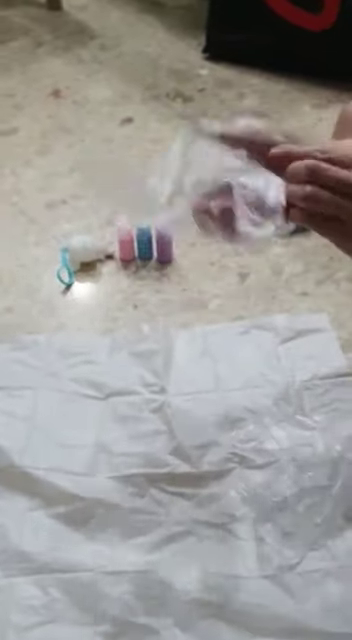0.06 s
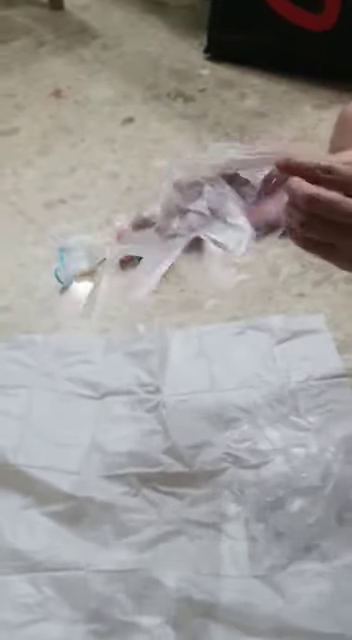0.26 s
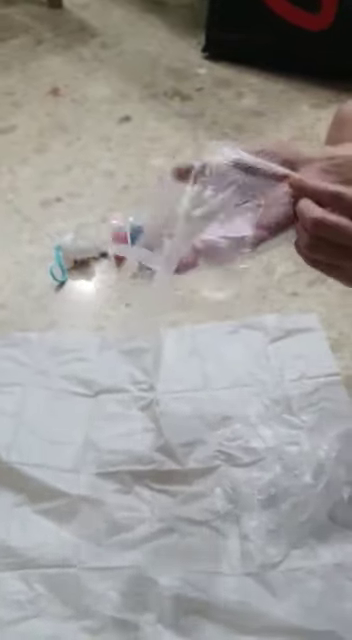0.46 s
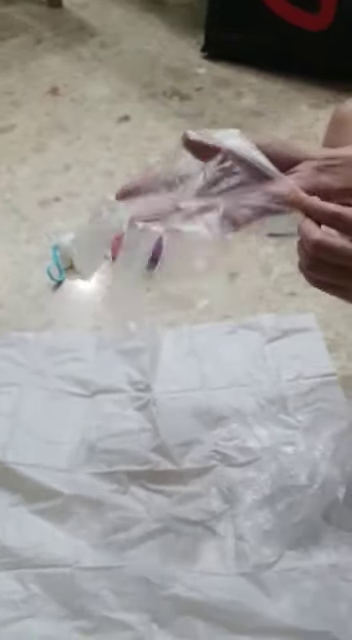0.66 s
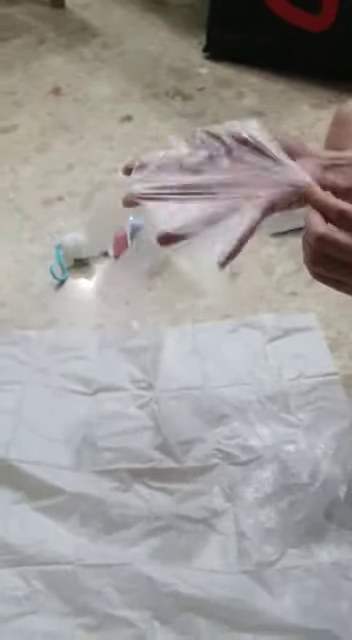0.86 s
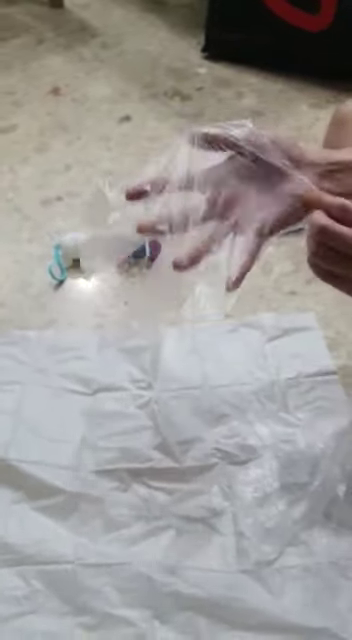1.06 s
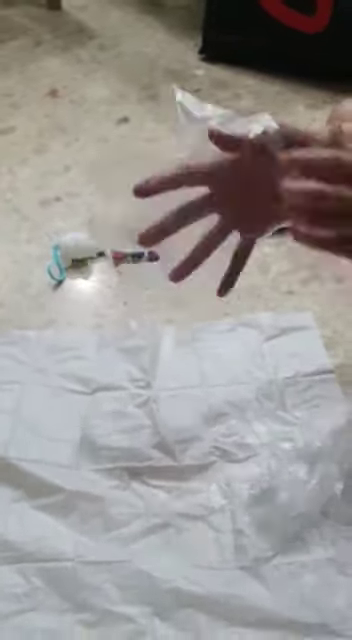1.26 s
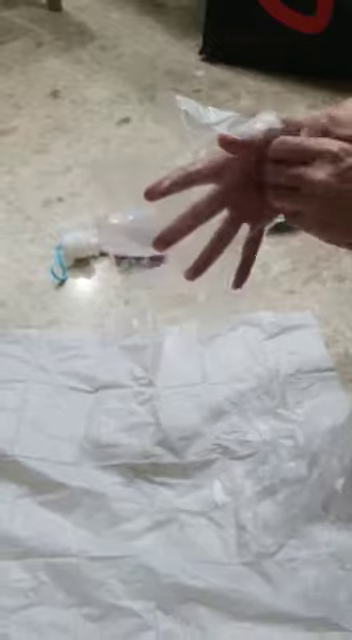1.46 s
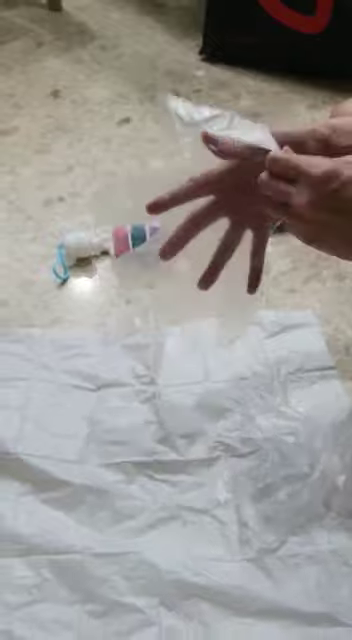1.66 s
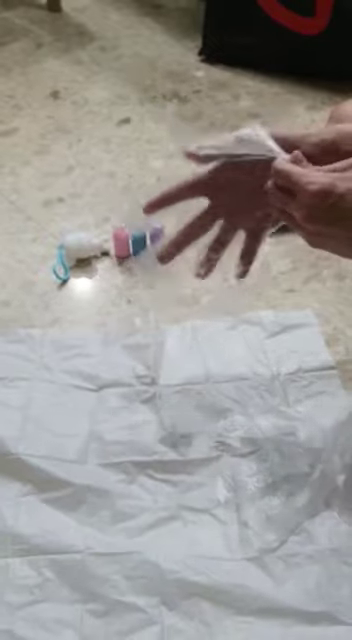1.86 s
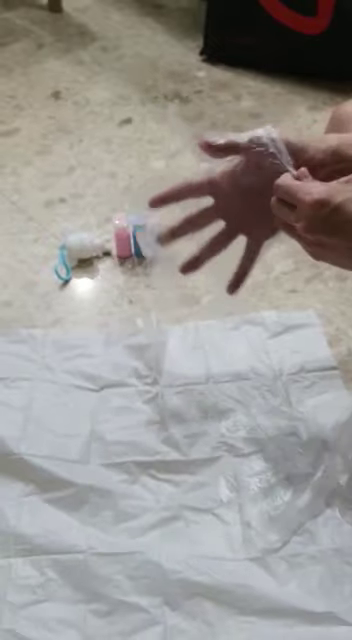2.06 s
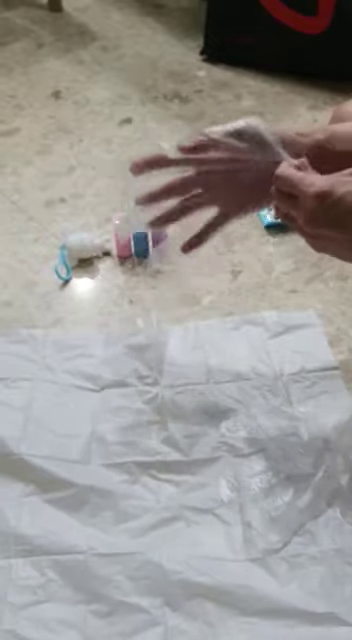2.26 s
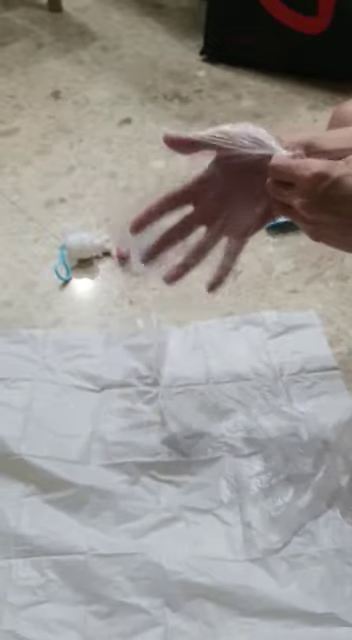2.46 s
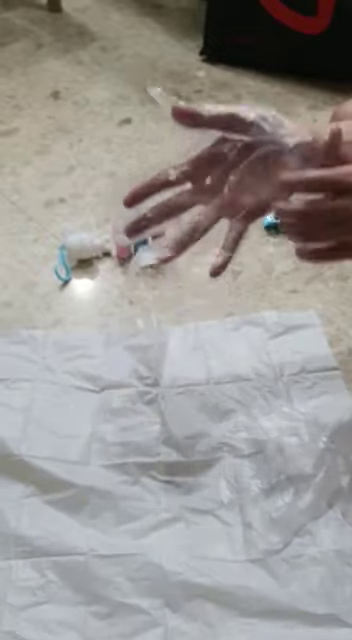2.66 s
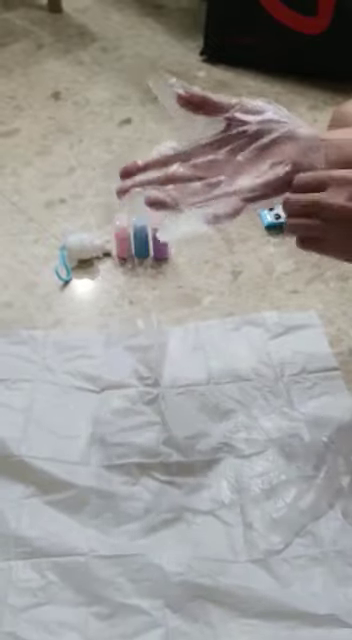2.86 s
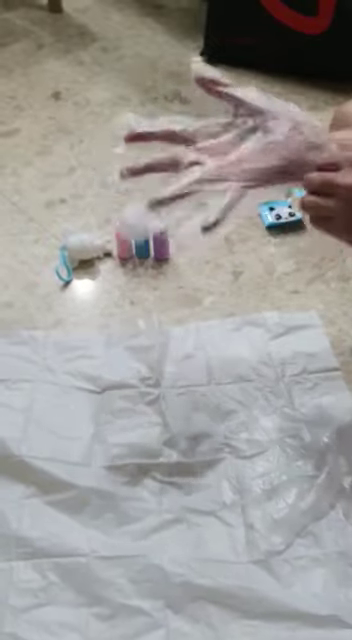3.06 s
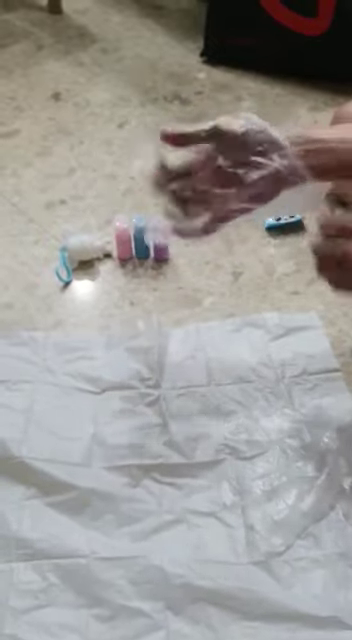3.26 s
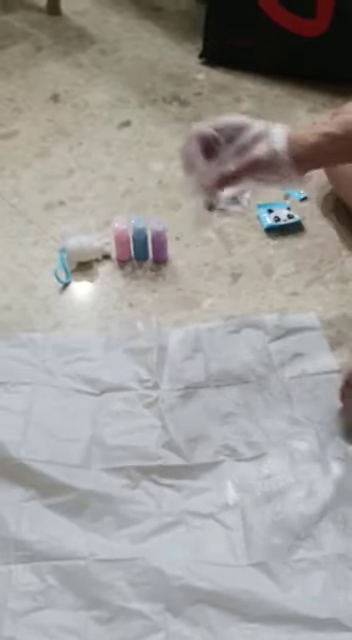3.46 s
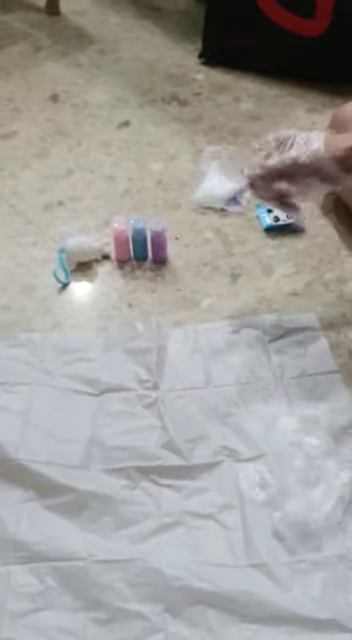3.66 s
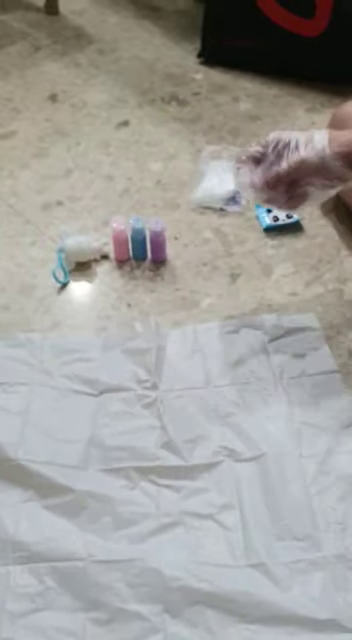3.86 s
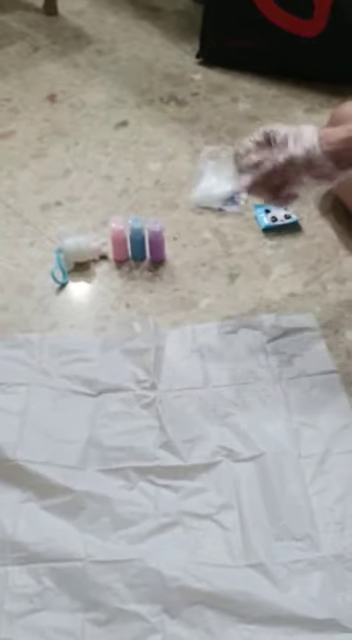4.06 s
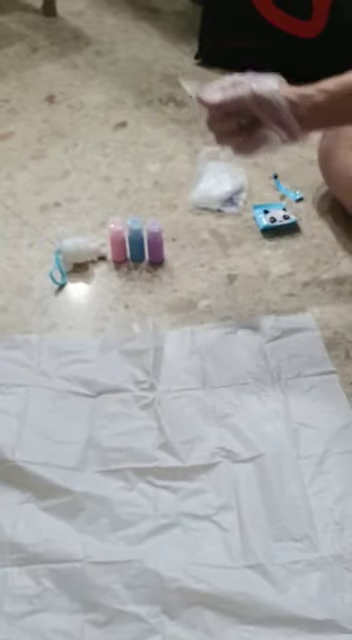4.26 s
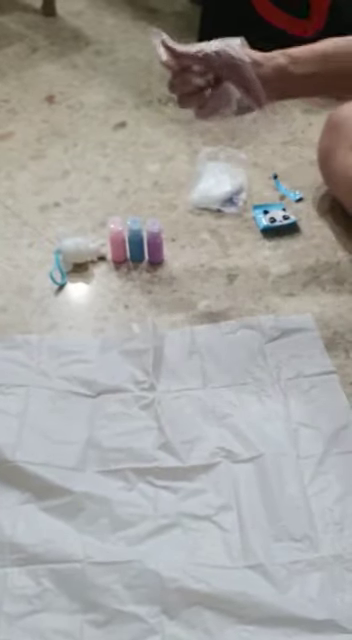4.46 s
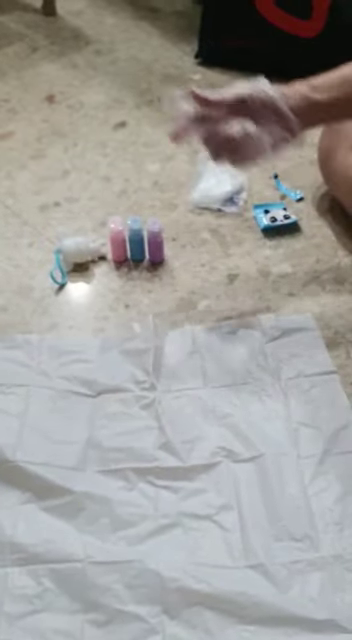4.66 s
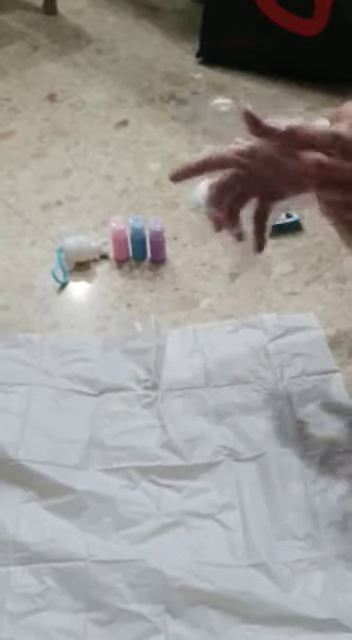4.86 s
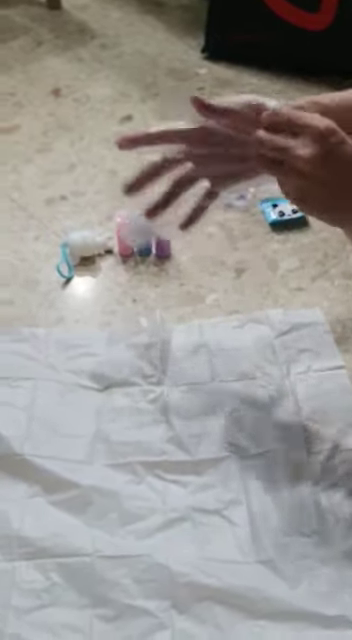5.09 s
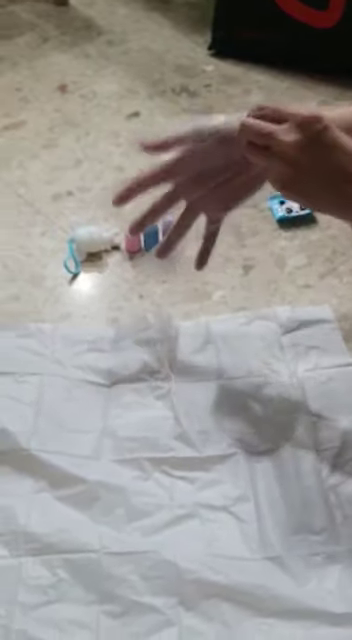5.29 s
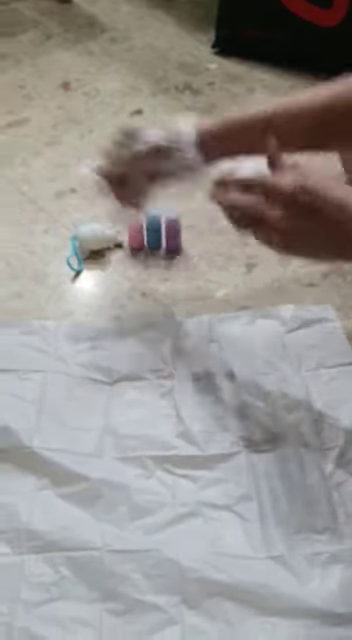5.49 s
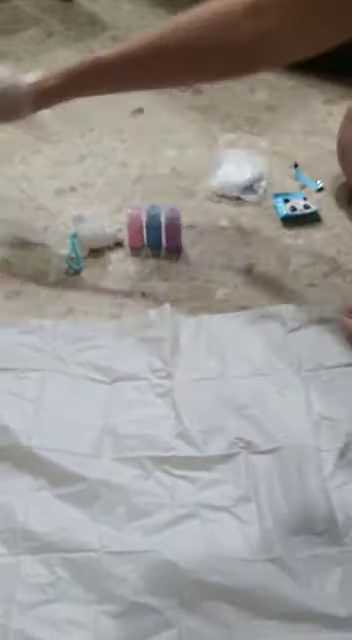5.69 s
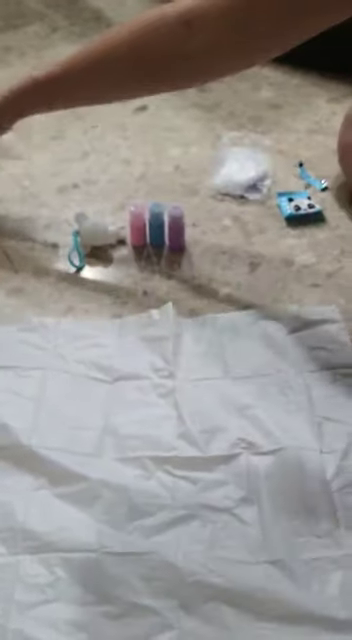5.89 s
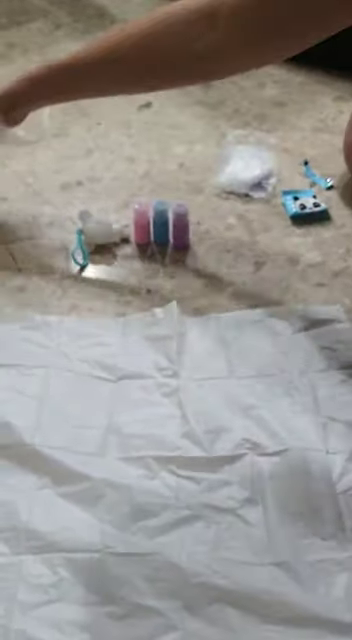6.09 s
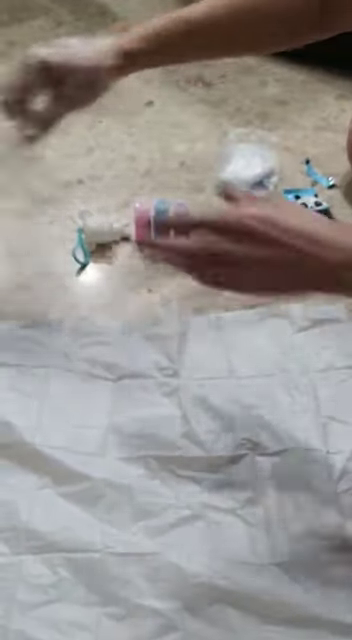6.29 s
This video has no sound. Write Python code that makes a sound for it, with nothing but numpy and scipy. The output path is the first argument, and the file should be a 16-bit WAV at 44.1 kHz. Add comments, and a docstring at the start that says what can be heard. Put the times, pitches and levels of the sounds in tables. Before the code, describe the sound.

A thin plastic glove is pulled on and flexed very near a stereo microphone in a small room with quiet air and a faint, steady low hum. From 0 to 1.2 s, quick uneven tugs give bright hissing and crackling crumples, with a cluster of small snaps around 0.7-0.85 s. From 1.2 to 1.6 s it thins to light rustle. Between 1.65 and 2.5 s the tugs are strong, with crisp cracks near 1.8 and the sharpest at about 2.15 s. More crumpling and snaps come at 2.9-3.1 s. From 3.2 to 5 s the film only rustles softly, with a brief crinkle near 4.5 s. At 5.1-5.2 s a loud, sudden burst of crackle breaks out, followed by smaller rustles to 5.5 s. A short dull knock sounds at 5.7 s, slightly right, then faint rustling fades into room hum by 6.3 s.

```python
"""Plastic glove pulled on

In a small room, close to a two-port microphone, a thin plastic glove is tugged onto a hand and flexed.
The film hisses as it slides on skin (dense tiny clicks), crumples under each tug (popping folds over a
fluttering sheet) and snaps taut (a crack and a dying burst of creases).
One dull knock of damped sines sounds near the end; room air and a faint low hum lie behind."""
import sys
import numpy as np
from scipy import signal
from scipy.fft import rfft, irfft, next_fast_len
from scipy.io import wavfile
from scipy.ndimage import map_coordinates

SR = 44100
rng = np.random.default_rng(int(sys.argv[2]) if len(sys.argv) > 2 else 0)


def generate_wav(sig):
    """Save sig (samples, or channels by samples) to the path in sys.argv[1] as 16-bit PCM at SR."""
    pcm = np.round(np.clip(np.atleast_2d(sig).T, -1, 1) * 32767).astype(np.int16)
    wavfile.write(sys.argv[1], SR, pcm)


N = 279153  # samples
TIME = np.arange(N) / SR  # seconds


def amp(db):
    """Decibels to gain."""
    return 10 ** (np.asarray(db) / 20)


def unit(x):
    """Scale to rms 1."""
    return x / np.sqrt(np.mean(x ** 2) + 1e-20)


def along_hz(points, hz):
    """Read (Hz, value) points on a log frequency axis."""
    point_hz, values = np.transpose(points)
    return np.interp(np.log(hz + 1), np.log(point_hz + 1), values)


def along_time(points):
    """Read (seconds, value) points at every sample."""
    return np.interp(TIME, *np.transpose(points))


def wobble(rate):
    """A smooth random curve with the given number of knots a second."""
    knots = rng.standard_normal(int(N * rate / SR) + 4)
    return map_coordinates(knots, [TIME * rate])


def filtered(x, response):
    """x times a complex response of frequency."""
    size = next_fast_len(N + SR // 4)
    spectrum = rfft(x, size) * response(np.fft.rfftfreq(size, 1 / SR))
    return irfft(spectrum, size)[..., :N]


def coloured(x, spectrum, size=2048):
    """x through a causal (minimum-phase) filter of energy 1 with the given spectrum."""
    gains = amp(along_hz(spectrum, np.fft.rfftfreq(size, 1 / SR)))
    cepstrum = irfft(np.log(gains))
    # folding the cepstrum forward in time makes the filter causal
    cepstrum[1:size // 2] *= 2
    cepstrum[size // 2 + 1:] = 0
    pulse = irfft(np.exp(rfft(cepstrum)))
    return signal.fftconvolve(x, pulse[None] / np.linalg.norm(pulse), axes=1)[:, :N]


def spread(pair, alike):
    """Mix two unrelated signals, taken as mid and side, into left and right of a given likeness."""
    def mid_side_gains(hz):
        turn = np.arccos(np.clip(along_hz(alike, hz), 0, 1)) / 2
        return np.array([np.cos(turn), np.sin(turn)])
    mid, side = filtered(pair, mid_side_gains)
    return np.array([mid + side, mid - side])


def thin(hz, corner_hz):
    """Second-order bass roll-off."""
    u = 1j * hz / corner_hz
    return u * u / (1 + np.sqrt(2) * u + u * u)


# Colour of the air in the room. Each row: frequency in Hz, relative level in dB per Hz.
AIR_COLOUR = [(12, -20), (20, -3), (48, -3), (70, -4), (125, -3.5), (170, -2), (230, -8.5), (350, -7),
              (580, -14), (1700, -11), (2500, -19), (5000, -15), (6500, -4), (9000, -17.5), (16000, -25.5)]
# Steady hum lines low in the room. Each row: frequency in Hz, level in dB rms before it wavers.
HUM_LINES = [(32.3, -62), (91.0, -69), (183.2, -62), (326, -76)]


def background():
    """Room air is coloured noise; the low hum, as of a fan, is sines wavering in level and phase."""
    noise = filtered(rng.standard_normal((2, N)), lambda hz: amp(along_hz(AIR_COLOUR, hz)))
    # likeness of left and right: (Hz, 0-1)
    air = amp(-52.5) * unit(spread(noise, [(100, 0.96), (500, 0.64), (2000, 0.28)]))
    waver_db, waver_rate = 1.3, 4  # depth in dB, knots a second
    hum = np.zeros(N)
    for hz, db in HUM_LINES:
        level = amp(db + waver_db * wobble(waver_rate))
        phase = 2 * np.pi * hz * TIME + 0.23 * wobble(2.91)
        hum += level * unit(np.sin(phase))
    return air + hum


def creases(per_second, scatter_db):
    """Tiny buckling clicks of uneven size, each radiating its own way; rms 1."""
    happens = rng.random(N) < per_second / SR
    size = amp(scatter_db * np.clip(rng.standard_normal(N), -2, 2))
    direction = rng.uniform(0, 2 * np.pi, N)
    return unit(happens * size * np.array([np.cos(direction), np.sin(direction)]))


def pop(turns, cycles):
    """A fold pops over and rings: a sine with a quick rise, fading by a factor e every few cycles."""
    return np.sin(2 * np.pi * turns) * np.exp(-turns / cycles) * (1 - np.exp(-2 * turns))


def grains(per_second, pitch, spread_octaves, cycles, scatter_db, size=256):
    """Many popping folds, scattered around a moving pitch, each radiating its own way; rms 1."""
    count = int(per_second * N / SR)
    luck = rng.random((count, 2))
    normal = np.clip(rng.standard_normal((count, 2)), -2, 2)
    start = (luck[:, 0] * N).astype(int)
    hz = pitch[start] * 2 ** (spread_octaves * normal[:, 0])
    # the root of the pitch makes up for the shorter ring of high folds
    strength = amp(scatter_db * normal[:, 1]) * np.sqrt(hz)
    rings = strength[:, None] * pop(hz[:, None] * np.arange(size) / SR, cycles)
    where = (start[:, None] + np.arange(size)).ravel()
    direction = 2 * np.pi * luck[:, 1:]
    mid = np.bincount(where, (rings * np.cos(direction)).ravel(), N)[:N]
    side = np.bincount(where, (rings * np.sin(direction)).ravel(), N)[:N]
    return unit(np.array([mid, side]))


# Tugs and flexes of the hand, close to the microphone.
# Each row: time of the peak in seconds, sliding level in dB, crumpling level in dB, release in seconds.
HAND_STROKES = [(0.013, -29.5, -35, 0.071), (.165, -32, -36, .09), (.36, -35.5, -42.5, 0.18),
                (.52, -43, -54.5, 0.68), (.635, -36, -53, 0.074), (0.707, -30, -31, 0.15),
                (0.851, -26.5, -35.5, 0.057), (.975, -34, -40.5, 0.26), (1.055, -38, -42.5, 0.16),
                (1.178, -31.5, -59, 0.051), (1.335, -47, -63, .07), (1.405, -43, -64, 0.067),
                (1.5, -44, -60, 0.063), (1.61, -33, -51.5, .1), (1.67, -30, -40, 0.063),
                (1.823, -25.5, -31, 0.22), (1.96, -32, -35.5, .19), (2.161, -29, -35, 0.055),
                (2.26, -29.5, -37, 0.15), (2.47, -36, -44.5, 0.15), (2.59, -40, -52, 0.18),
                (2.77, -42.5, -67, 0.11), (2.891, -31, -36.5, 0.12), (2.968, -31.5, -32, 0.052),
                (3.081, -28.5, -34, 0.18), (3.265, -37.5, -50, 0.32), (3.565, -38, -48, 0.23),
                (3.81, -39, -47.5, 0.32), (4.05, -41, -49.5, 0.46), (4.35, -54, -52, 0.19),
                (4.54, -37, -45, 0.064), (4.81, -47.5, -58.5, 1), (5.09, -35.5, -51, 0.31),
                (5.136, -23, -30.5, 0.049), (5.167, -26, -32, 0.062), (5.27, -41.5, -44, 0.24),
                (5.33, -38, -44.5, 0.15), (5.449, -34.5, -46, 0.15), (5.59, -45, -55, 0.11),
                (6.0, -47, -56, .25), (6.08, -50, -63, .3)]
# The film never quite rests while the hand is near. Each row: time in seconds, sliding level in dB.
RESTING_RUSTLE = [(0, -44), (1.3, -52.5), (2.1, -48.5), (5.4, -48.5), (5.8, -53.5), (6.33, -60.5)]


def hand_work():
    """Gains of sliding and of crumpling: each stroke swells and dies away over the resting rustle."""
    attack_share = 0.86  # swell time as a share of the release time
    stroke_range_db = 24  # rise over the swell, and fall over the release
    crumple_steepness = 0.99  # slopes of crumpling relative to those of sliding
    resting_db = along_time(RESTING_RUSTLE)
    slide_power = amp(resting_db) ** 2
    crumple_power = amp(resting_db - 15.5) ** 2
    for s, slide_db, crumple_db, release in HAND_STROKES:
        away = np.maximum((s - TIME) / attack_share, TIME - s) / release
        near = away < 3
        drop_db = stroke_range_db * away[near]
        slide_power[near] += amp(slide_db - drop_db) ** 2
        crumple_power[near] += amp(crumple_db - crumple_steepness * drop_db) ** 2
    return np.sqrt(slide_power), np.sqrt(crumple_power)


# Colour of film sliding on skin. Each row: frequency in Hz, relative level in dB per Hz.
SLIDE_COLOUR = [(500, -25.5), (1000, -23), (1900, -22), (2800, -8), (3800, -12.5), (5000, -10), (5800, -1),
                (6600, 1.5), (8100, -5.5), (9300, -14), (10500, -11), (12000, -14.5), (16000, -14.5)]
# Loose sheet folds ring low, the tight folds of a fist high. Each row: time in seconds, fold pitch in Hz.
FOLD_PITCH = [(0, 2150), (.7, 1900), (1.15, 1360), (1.7, 1700), (2.22, 1324), (2.5, 1780), (2.9, 1304),
              (3.8, 2440), (5.15, 1670), (6.0, 1400)]
# Colour of the whole sheet fluttering under the folds. Each row: frequency in Hz, relative level in dB per Hz.
SHEET_COLOUR = [(100, -10), (200, -19.5), (350, -3), (550, -9), (900, -4), (2000, -3.5), (3000, 2),
                (4200, 0), (6000, -3), (16000, -17.5)]


def rustle():
    """Sliding film gives a fine hiss; crumpling pops folds in clumps and shakes the sheet."""
    sliding, crumpling = hand_work()
    clumps = wobble(90)
    hiss = coloured(creases(per_second=4000, scatter_db=4), SLIDE_COLOUR)
    slide = hiss * sliding * amp(1.08 * clumps)
    crumple = crumpling * amp(3.0 * clumps + 0.37 * wobble(70))
    folds = grains(per_second=1200, pitch=along_time(FOLD_PITCH), spread_octaves=0.436,
                   cycles=2.85, scatter_db=3.5)
    sheet = coloured(crumple * creases(per_second=1800, scatter_db=3.5), SHEET_COLOUR)
    return slide + amp(-5.0) * crumple * folds + amp(-1) * sheet


# The film snaps taut on the hand. Each row: start in seconds, relative level in dB,
# time to fall 60 dB in seconds (4 ms at least), flap level in dB relative to the snap, flap pitch in Hz.
TAUT_SNAPS = [(.153, -18, 0.077, -16, 1610), (.635, -18, 0.042, -13, 920), (.683, -12.5, 0.061, -23, 1500),
              (.698, -13, 0.079, -20, 303), (.708, -12.5, 0.047, -41, 1500),
              (.829, -11.5, 0.041, -22, 1170), (.835, -13, 0.052, -12.5, 1250),
              (.850, -14.5, .02, -10, 350), (.95, -19, .033, -27, 1200), (.976, -16.5, 0.047, -38, 1000),
              (1.113, -17, 0.067, -21.5, 910), (1.169, -17, 0.028, -13, 496),
              (1.665, -19.5, 0.033, -15, 880), (1.772, -14, 0.052, -18, 1300),
              (1.789, -6, 0.036, -17.5, 1100), (1.819, -17, 0.03, -18, 1100),
              (1.958, -10, 0.011, -21, 1300), (1.985, -23, 0.048, -12.5, 456),
              (2.144, -5, 0.026, -38, 1190), (2.148, -2, 0.0061, -20, 725),
              (2.209, -13.5, 0.026, -14, 1210), (2.224, -20, 0.024, -20, 790),
              (2.259, -12.5, 0.052, -35, 1290), (2.298, -14.5, 0.044, -21, 1300),
              (2.426, -20.5, 0.055, -37, 1190), (2.459, -10.5, 0.019, -22, 700),
              (2.869, -13.5, 0.036, -14.5, 850), (2.929, -12.5, 0.026, -15, 540),
              (2.963, -7.5, 0.025, -12.5, 574), (3.026, -15, .03, -22, 1000), (3.048, -9, 0.024, -14, 450),
              (3.064, -17, 0.023, -12, 390), (3.250, -19, .026, -17, 1100), (5.117, -15, 0.069, -16, 1410),
              (5.126, -14.5, 0.071, -8.5, 1600), (5.146, -15, 0.018, -10, 1400),
              (5.160, -9, 0.033, -16, 1300), (5.311, -15.5, 0.031, -12, 1750),
              (5.326, -25.5, 0.03, -0.5, 1800), (5.345, -36, 0.017, -10, 1600)]
# Colour of cracks and creases in a snap. Each row: frequency in Hz, relative level in dB per Hz.
SNAP_COLOUR = [(400, -16), (800, -22), (1200, -2), (2000, -4), (3300, 0), (4100, 1.5), (5000, -5),
               (6600, 4), (9000, -6.5), (16000, -11)]


def snaps():
    """Each snap is one sharp crack and an avalanche of creases; the taut sheet flaps at its own pitch."""
    crack_length = .018  # seconds; the shorter a snap, the stronger its crack, level with the snap here
    scatter_db = 2  # size scatter of the creases within a snap
    cracks, thumps = np.zeros((2, 2, N))
    bright, low = np.zeros((2, N))
    pitch = np.full(N, float(TAUT_SNAPS[0][-1]))
    for s, db, length, flap_db, flap_hz in TAUT_SNAPS:
        crack_db = 20 * np.log10(crack_length / length)
        start = round(s * SR)
        age = TIME[:N - start]
        rise = 1 - np.exp(-age / .0004)
        burst = amp(db - 60 * age / max(length, .004)) * rise
        bright[start:] += burst
        low[start:] += burst * amp(flap_db)
        pitch[start:] = flap_hz
        # crack and thump are in the middle (mid) signal only, so they sound alike in both ears
        cracks[0, start] = amp(db + crack_db)
        thumps[0, start:] += amp(db + flap_db + crack_db + 1) * pop(flap_hz * age, cycles=0.18)
    avalanche = amp(-10.0) * bright * creases(per_second=5500, scatter_db=scatter_db)
    flap = amp(-6.0) * low * grains(per_second=1500, pitch=pitch, spread_octaves=0.5,
                                    cycles=1.0, scatter_db=scatter_db)
    sharp = coloured(cracks + avalanche, SNAP_COLOUR)
    return sharp + filtered(thumps + flap, lambda hz: thin(hz, corner_hz=240))


# Dull knock near the end. Each row: start in seconds, relative level in dB.
KNOCK_TIMES = [(5.700, -17.5)]
# What the knock rings with. Each row: frequency in Hz, relative level in dB, time to fall 60 dB in seconds.
KNOCK_RINGS = [(350, -7, 0.011), (810, -17, 0.0065), (1420, -1, 0.0066), (1690, -8, 0.0094)]


def knock():
    """A short, heavily damped knock, a little to the right; a small object radiates little bass."""
    out = np.zeros(N)
    for s, db in KNOCK_TIMES:
        age = np.maximum(TIME - s, 0)
        for hz, level, t60 in KNOCK_RINGS:
            out += amp(db + level - 60 * age / t60) * np.sin(2 * np.pi * hz * age)
    dull = filtered(out, lambda hz: thin(hz, corner_hz=258) / (1 + 1j * hz / 3500))
    return dull * amp([[-1], [2]])


# Decay of the small room. Each row: frequency in Hz, time to fall 60 dB in seconds.
ROOM_DECAY = [(200, 0.048), (2000, 0.25), (7000, 0.31), (15000, 0.16)]


def room(x, count=16):
    """The walls answer 5 ms later with a diffuse noise tail, drawn afresh for each equal stretch of time."""
    out = np.zeros((2, N + SR))
    step = N // count + 1
    for start in range(0, N, step):
        hz, t, z = signal.stft(rng.standard_normal((2, SR // 3)), SR, nperseg=256)
        decay = amp(-60 * t / along_hz(ROOM_DECAY, hz)[:, None])
        tail = signal.istft(z * decay, SR)[1]
        echo = signal.fftconvolve(x[:, start:start + step], tail / np.linalg.norm(tail[0]), axes=1)
        out[:, start + round(.005 * SR):][:, :echo.shape[1]] += echo
    return out[:, :N]


# Left-right likeness of the film's sound at the microphone. Each row: frequency in Hz, likeness from 0 to 1.
FILM_LIKENESS = [(200, 0.98), (700, 1), (1500, 0), (4000, 0.35), (14000, 0.03)]


def scene():
    """The glove reaches the left port a little before the right; glove and knock sound in the room."""
    lead = .0002  # seconds from left to right

    def early_left(hz):
        return np.exp(1j * np.pi * hz * lead * np.array([[1], [-1]]))
    glove = filtered(spread(rustle() + snaps(), FILM_LIKENESS), early_left)
    tap = knock()
    close = amp(2.5) * glove + tap
    walls = amp(-4.0) * room(glove) + amp(-16.5) * room(tap)
    return close + walls + background()


# The two microphone ports differ in colour. Each row: frequency in Hz, left minus right in dB.
PORT_COLOUR = [(100, -2), (550, -1), (1200, -4.5), (2800, -3), (4200, -3.5), (5400, -5.5), (6400, -16),
               (7400, -7.5), (8400, 1), (9800, -6.5), (12000, 6.5), (15000, 8)]


def record(dry):
    """Each port adds its own colour; peaks beyond 0.9 clip; nothing is kept above the band limit."""
    top_hz = 16100

    def ports(hz):
        gains = amp(along_hz(PORT_COLOUR, hz) * np.array([[.5], [-.5]]))
        return gains / np.sqrt(np.mean(gains ** 2, axis=0))
    heard = np.clip(filtered(dry, ports), -.9, .9)
    return filtered(heard, lambda hz: hz < top_hz)


dry = scene()
out = record(dry)
generate_wav(out)
```